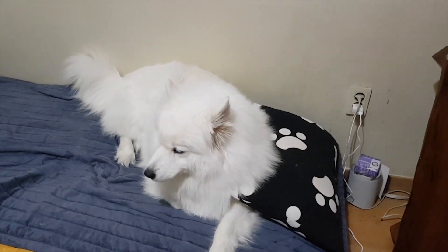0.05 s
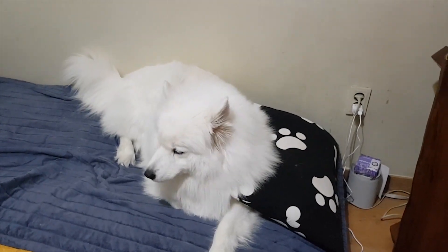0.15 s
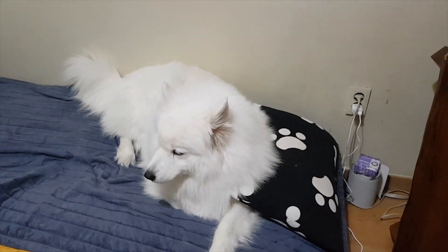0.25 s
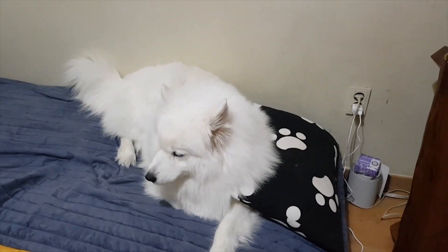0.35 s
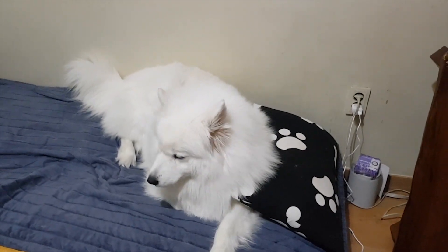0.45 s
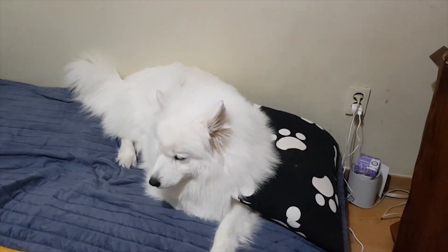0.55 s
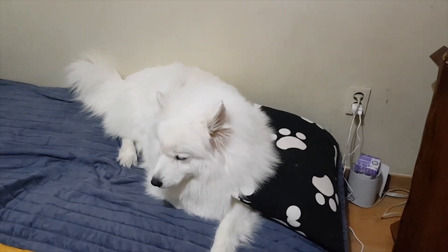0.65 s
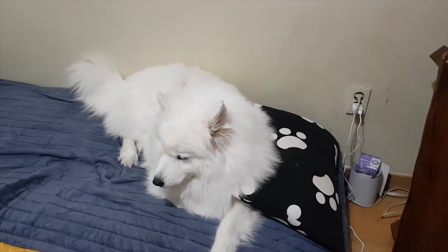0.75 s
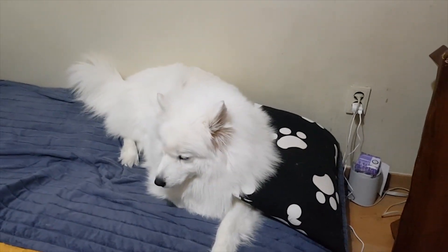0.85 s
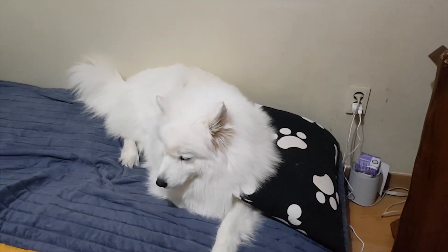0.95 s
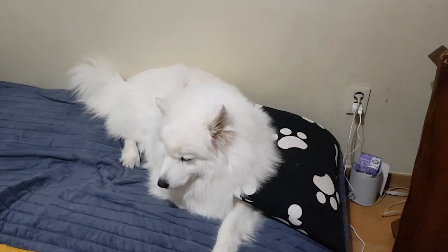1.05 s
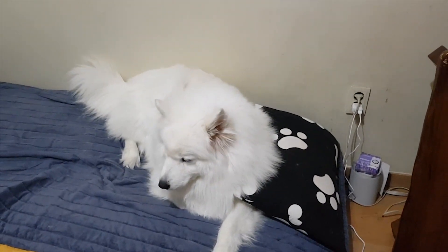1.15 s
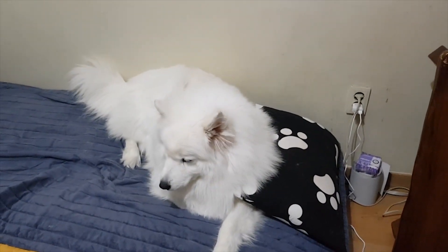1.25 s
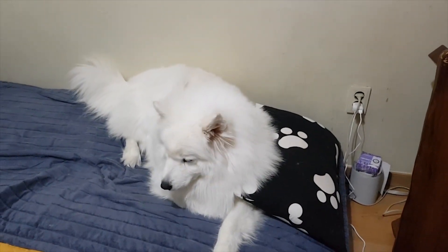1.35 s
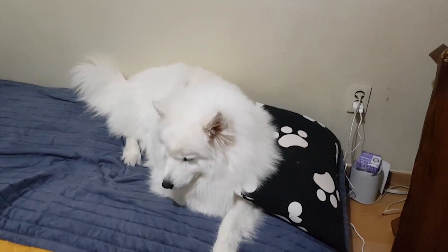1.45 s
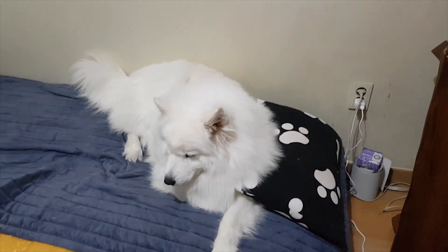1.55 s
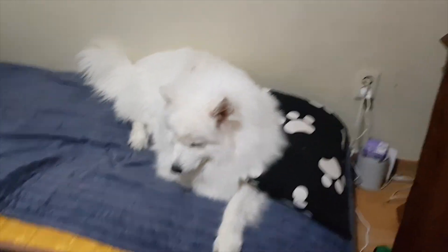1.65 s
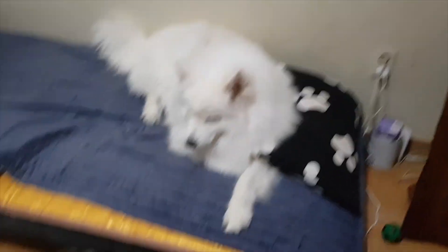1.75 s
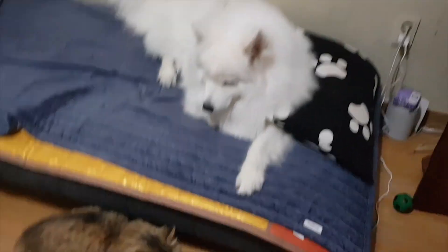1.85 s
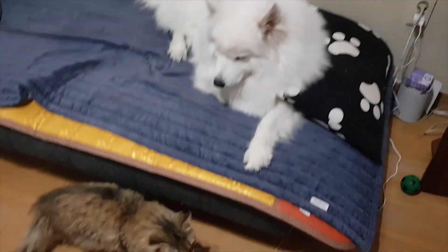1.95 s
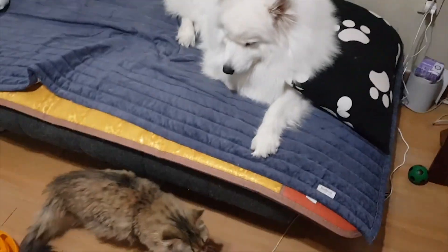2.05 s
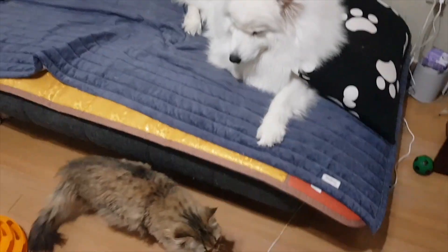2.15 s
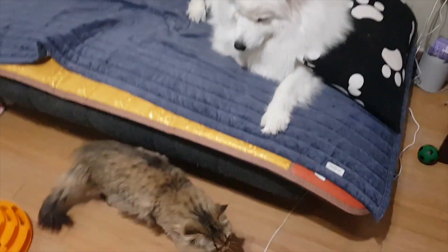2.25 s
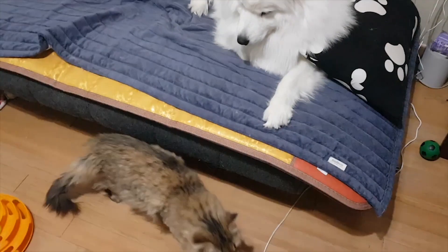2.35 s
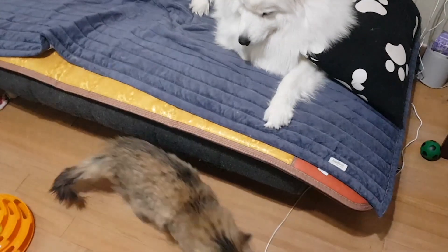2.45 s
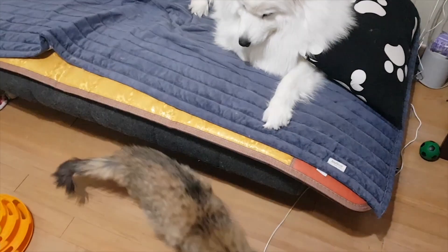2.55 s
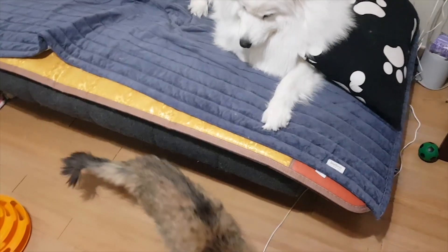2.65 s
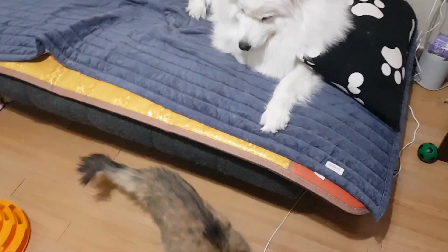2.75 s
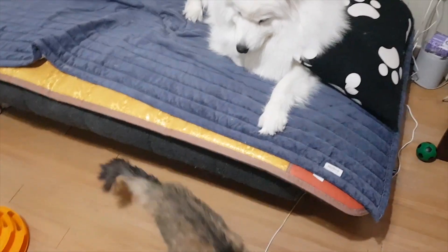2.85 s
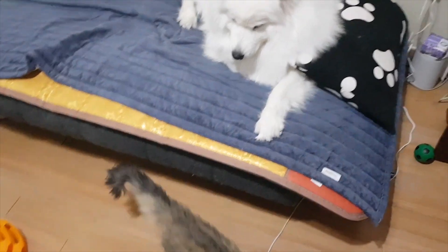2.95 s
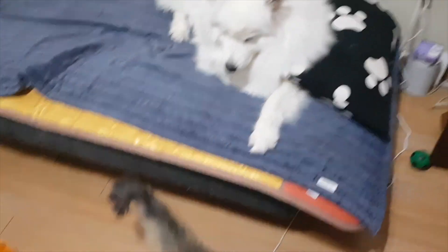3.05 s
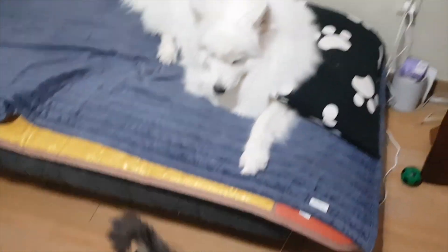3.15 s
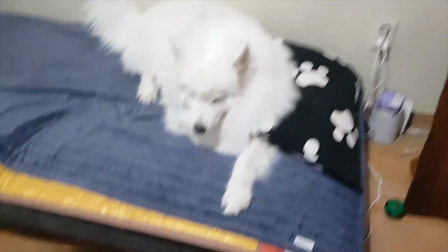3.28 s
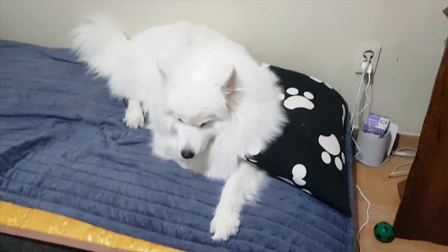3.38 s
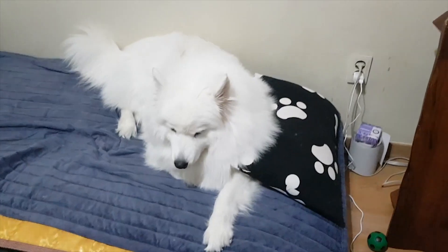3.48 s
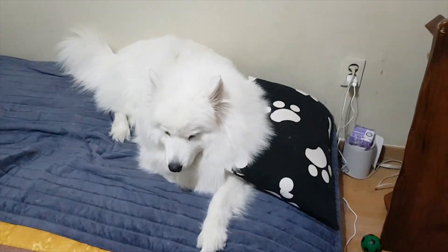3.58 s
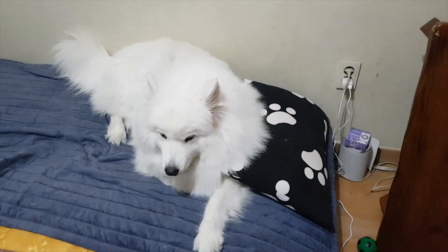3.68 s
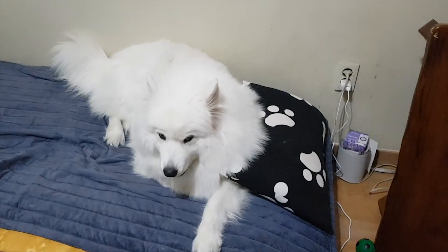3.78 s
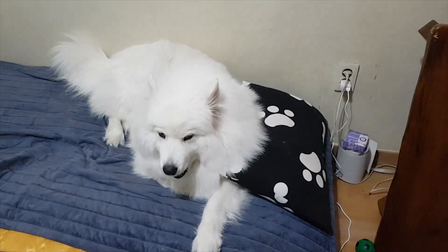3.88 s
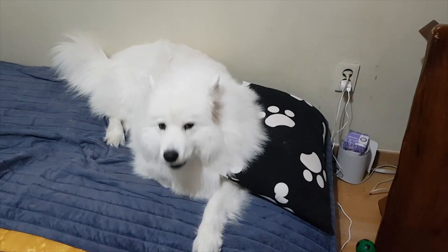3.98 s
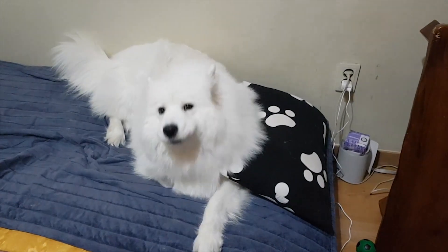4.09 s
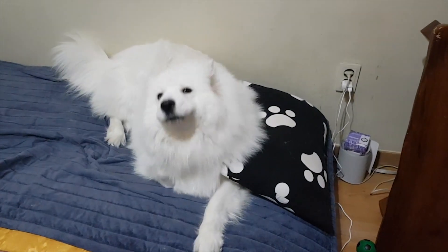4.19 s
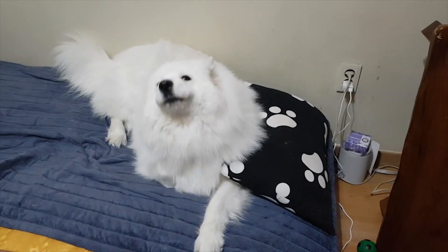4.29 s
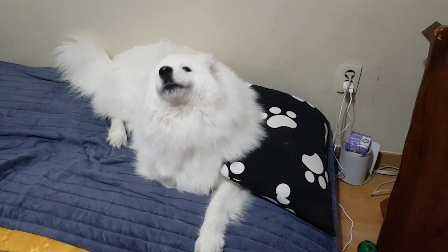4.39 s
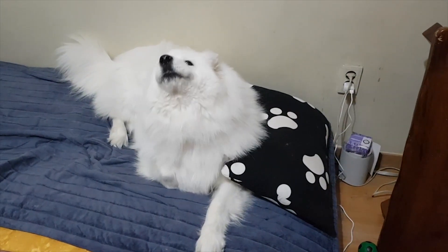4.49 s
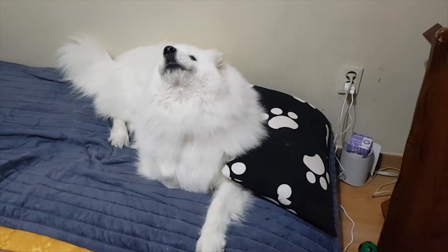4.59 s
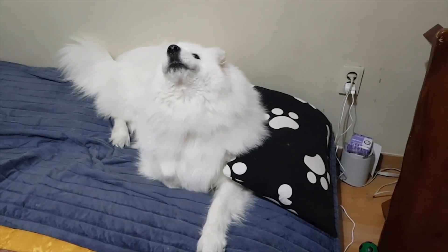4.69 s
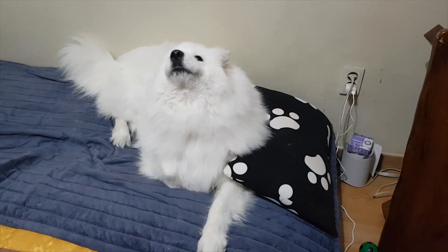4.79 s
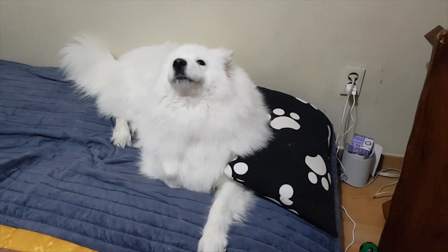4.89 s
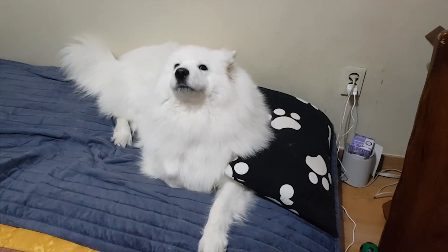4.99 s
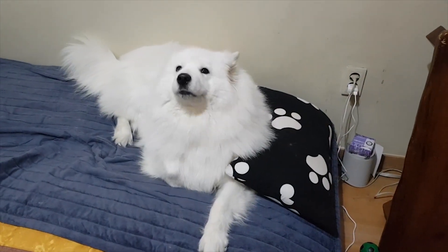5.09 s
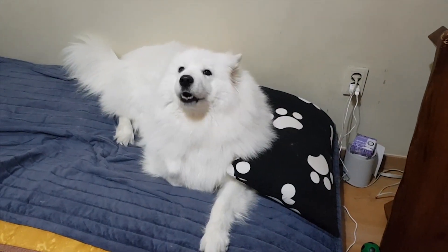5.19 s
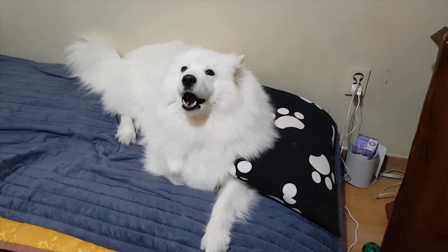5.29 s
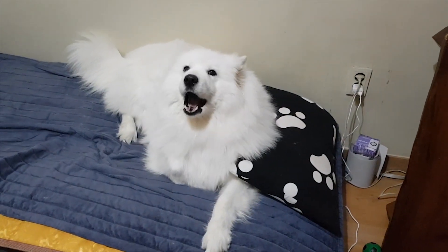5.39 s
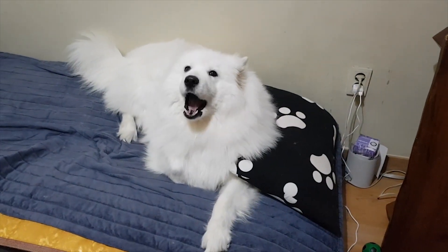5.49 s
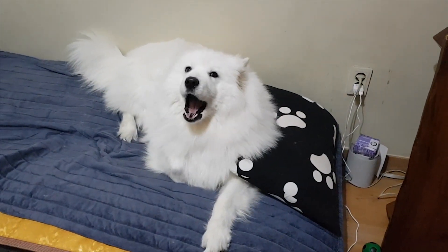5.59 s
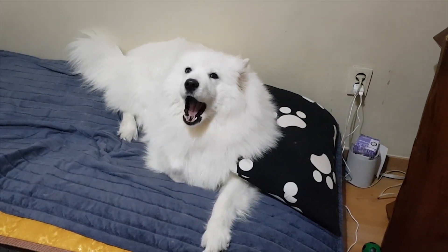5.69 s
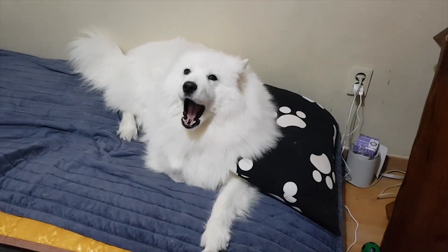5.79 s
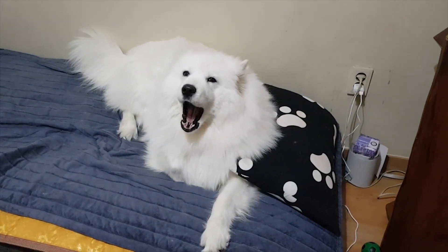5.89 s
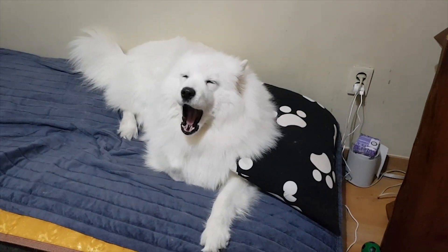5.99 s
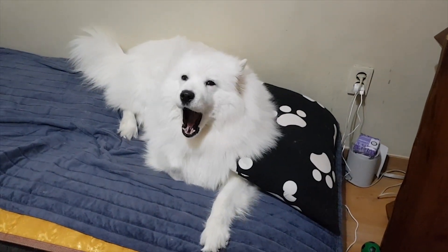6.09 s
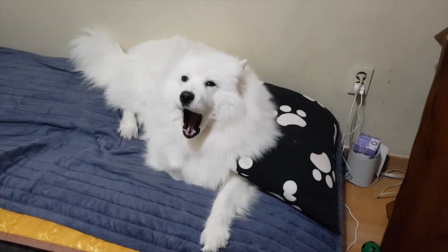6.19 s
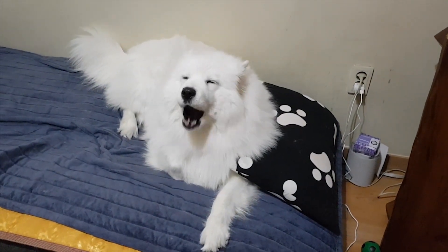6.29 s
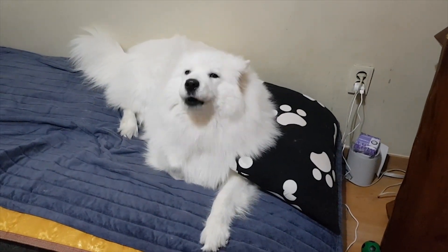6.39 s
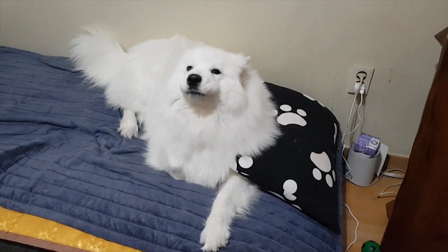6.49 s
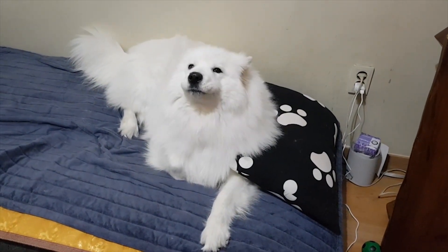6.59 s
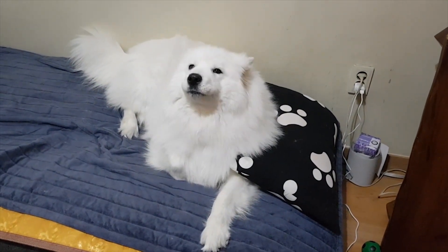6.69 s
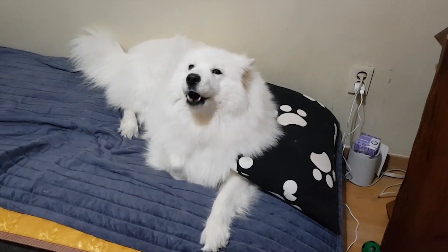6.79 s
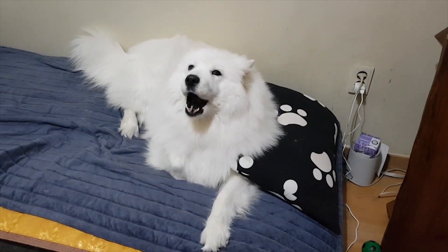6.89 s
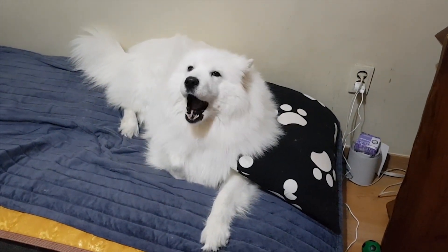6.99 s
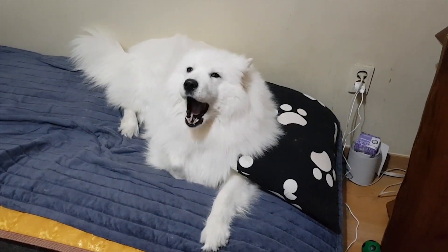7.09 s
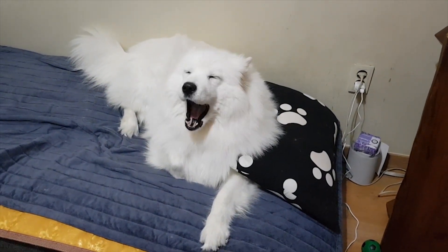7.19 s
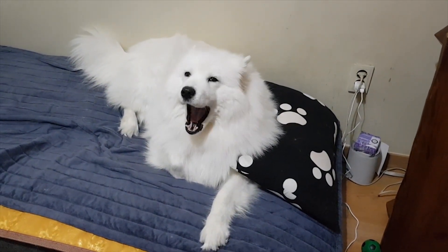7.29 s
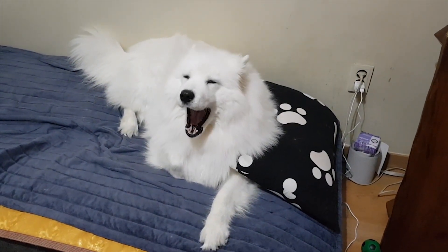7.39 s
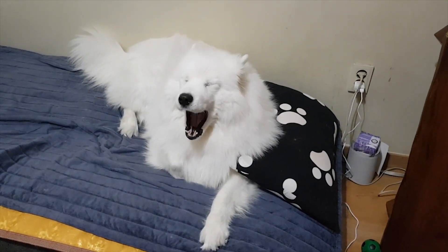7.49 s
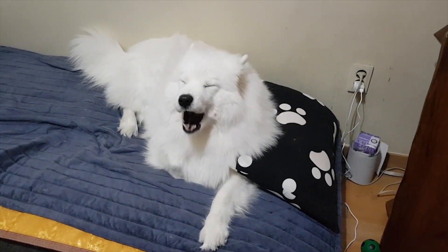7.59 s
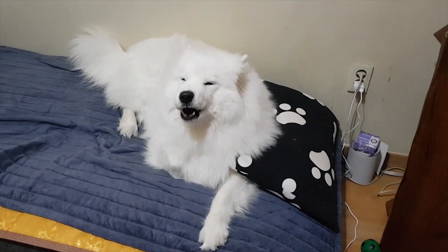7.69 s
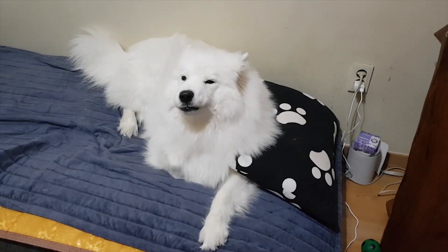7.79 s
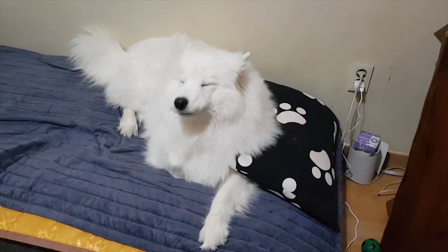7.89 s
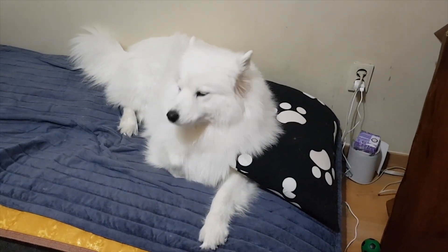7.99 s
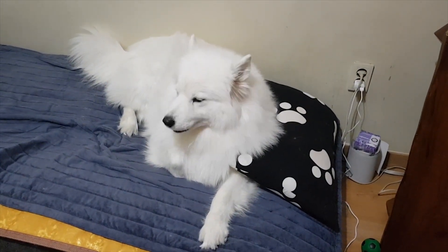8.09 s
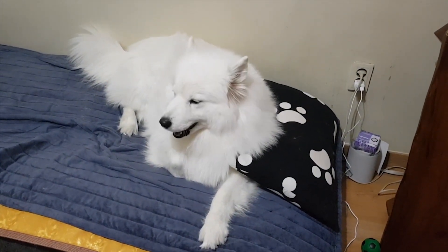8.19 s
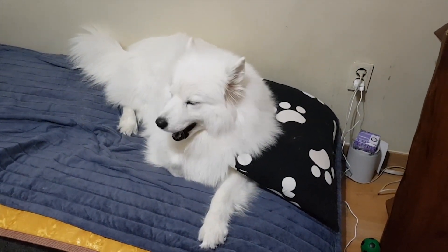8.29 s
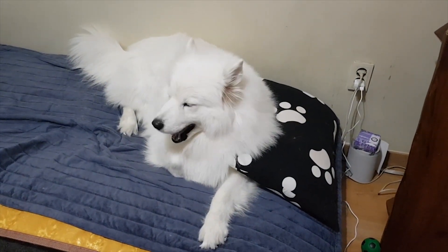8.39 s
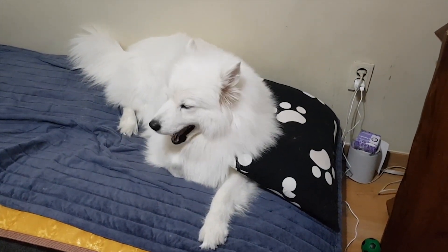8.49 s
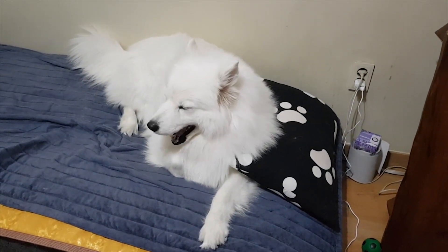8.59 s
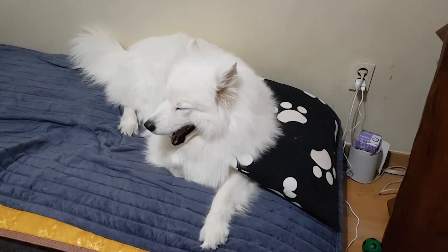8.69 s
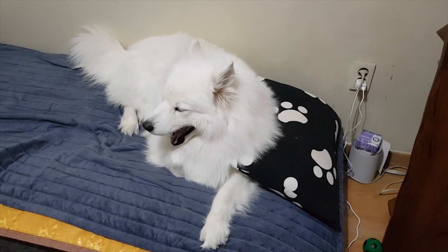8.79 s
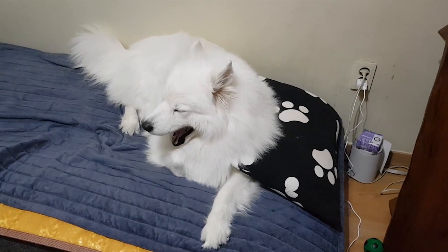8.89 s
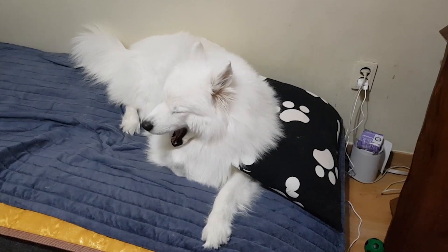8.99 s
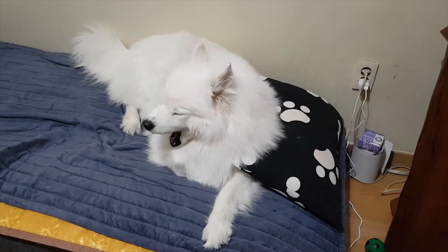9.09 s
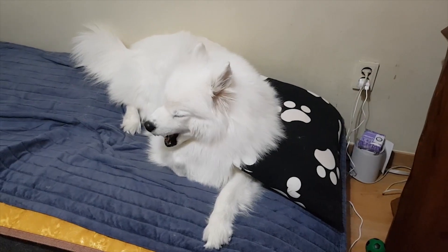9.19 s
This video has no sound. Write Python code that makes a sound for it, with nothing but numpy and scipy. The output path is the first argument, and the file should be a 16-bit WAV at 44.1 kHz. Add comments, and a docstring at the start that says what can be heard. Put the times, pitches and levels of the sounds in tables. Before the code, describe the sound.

Close, pulsing dog grumbles rise into brief howls, with a few soft cat meows and light floor taps early on.

```python
"""A dog grumbles at a cat

In a small, quiet bedroom, a dog on a mattress growls: its loose vocal folds slap shut in slow pulses,
speed up, tighten into a clean howl and fall back. Its nose whistles and its lips smack. Further off,
a cat meows and chirps, shaping the sound with its jaw, and a few taps and crackles come from the floor.
A phone with two microphones hears it all from about a metre, over a low room rumble."""
import sys
import numpy as np
from scipy import signal
from scipy.fft import rfft, irfft
from scipy.io import wavfile

SR = 44100
rng = np.random.default_rng(int(sys.argv[2]) if len(sys.argv) > 2 else 0)


def file_out(sig):
    """Save sig as 16-bit WAV at sys.argv[1]."""
    # one column per channel
    cols = np.atleast_2d(sig).T
    # limit, then scale
    lim = np.clip(cols, -1, 1)
    pcm = np.round(lim * 32767).astype(np.int16)
    wavfile.write(sys.argv[1], SR, pcm)


N = 407925

# The dog's growls. Each row: start and length in seconds, first and last pulse rate in Hz, middle and
# width of the turn between them as shares of the length, base level in dB, fade-in and fade-out in
# seconds, mouth level and its mid-growl change in dB, roughness from 0 to 1, and the factor by which
# the lips shift the muzzle's resonances.
DOG_GROWLS = [ (0.0, 0.75, 67.9, 44.37, 0.73, .14, -36.5, 0.0058, 0.18, -26.5, -9, .2, 1.153),
              (1.3, 0.33, 60.77, 53.8, 0.81, .12, -39.5, .18, 0.23, -28, -11, 0.67, 1.27),
              (3.15, 1.17, 51.68, 101.7, .63, .1, -39.5, 0.2, .04, -28.5, -22, 0.26, 1),
              (4.301, 0.34, 103.6, 84.8, 0.57, 0.095, -46, 0.019, .02, -22, 1.5, .9, .95),
              (4.579, 0.58, 80.9, 50.23, 0.53, 0.059, -34, 0.0076, 0.18, -29, -7, .62, 0.99),
              (5.671, 0.72, 72.43, 110.2, .73, 0.15, -34, .13, 0.099, -33.5, -7.5, .18, .99),
              (6.75, 0.47, 78.23, 102.2, 0.74, .2, -29.5, 0.022, 0.6, -34, -12.5, 0.17, .9),
              (8.051, 0.25, 61.3, 46.94, .55, 0.16, -37, .01, 0.22, -37, 4.5, 0.89, 1.06),
              (8.68, 0.39, 57.27, 65.5, 0.42, 0.18, -53.5, 0.038, 0.046, -43, 1, .9, 1.05), ]
# One list for each howl. Each row: time in seconds, pitch in Hz, base levels of voice and mouth in dB.
DOG_HOWLS = [
    [(4.22, 199.6, -26.5, -73.5), (4.27, 206.2, -27.5, -62), (4.45, 218.6, -29.5, -59),
     (4.56, 207.6, -28.5, -62.5), (4.61, 209, -31.5, -71)],
    [(6.32, 203.6, -34, -68.5), (6.37, 223.5, -28, -60.5), (6.405, 228.6, -20.5, -59.5),
     (6.49, 231.2, -22.3, -57), (6.61, 222.5, -24.5, -55), (6.66, 205.7, -32.5, -54),
     (6.78, 189.2, -35.5, -61.5)],
    [(7.2, 239.5, -31.5, -91.5), (7.245, 230.3, -29, -83.5), (7.35, 275.6, -30.5, -88),
     (7.55, 355.4, -33.5, -87.5), (7.7, 363.2, -36, -82.5), (7.86, 378.3, -36.5, -87),
     (7.935, 364.3, -45, -88), (8.025, 237, -28, -72), (8.11, 232.3, -59.5, -73.5)],
    [(8.97, 217, -52, -83), (9.01, 246, -41, -94), (9.08, 287.6, -49, -100), (9.2, 321, -56.5, -103)],
]
# Thin whistles through the dog's nose, and whining tones over its growl.
# Each row: start and length in seconds, first and last pitch in Hz, base level in dB.
NOSE_WHISTLES = [(3.4, .72, 5480, 5390, -85.5), (6.49, .2, 5850, 5820, -74.5)]
DOG_WHINES = [(6.289, 0.15, 925, 841, -49.5), (6.768, .27, 762, 906, -55)]
# The dog's lips and tongue. Each row: start in seconds, peak in dB, resonance and its width in Hz.
LIP_SMACKS = [(4.057, -58.5, 3440, 448), (5.296, -56, 890, 59.6), (5.298, -73, 2020, 200),
              (5.419, -61, 1040, 120), (5.462, -72, 2710, 300), (6.382, -49, 2230, 594)]
# The cat's calls. Each row: start and length in seconds, first, turning and last pitch in Hz, share of
# the length before the turn, base level in dB, fade-in and fade-out in seconds, first and last jaw
# resonance in Hz, its shift as the jaw gapes in Hz, and how long the call stays hoarse in seconds.
CAT_MEOWS = [ (0.66, 0.5, 540.4, 604.6, 545.4, 0.82, -52, 0.075, 0.015, 1370, 2490, 2200, .25),
             (1.678, 0.32, 646, 673.3, 656, 0.61, -51.5, .27, .14, 1970, 2000, 0, 0.174),
             (2.041, 0.076, 705, 728, 726, 0.88, -68, 0.036, 0.06, 2150, 2150, 0, 0.036),
             (2.98, 0.36, 446.5, 543, 555, .77, -46.5, 0.18, 0.27, 1640, 2720, -250, 0.177), ]
# Taps and crackles. Each row: start in seconds, level in dB, snap compared with the knock in dB.
FLOOR_TAPS = [(.429, -48.5, -5), (0.45, -54, -25), (0.532, -60.5, -3), (1.581, -59.5, 14.5),
              (1.599, -60, 12), (1.619, -58.5, 17.5), (1.628, -58.5, 9), (1.655, -66, -6), (1.662, -56, 8),
              (2.126, -63.5, -8)]
# Standing waves: notes that ring on in the dog's corner. Each row: frequency and width in Hz, gain in dB.
STANDING_WAVES = [(105.9, 1.9, 4), (156, 11, -8), (219, 7.4, -15), (468, 4.7, 7.5), (607, 28, -0.5),
                  (729, 8.3, 9), (1066, 12, 10.5)]

# A tone colour says how strong the lows and highs are. Each row: frequency in Hz, relative level in dB.
THROAT_COLOUR = [(50, -33.5), (80, -12.5), (102, 3), (120, -5), (148, 0.5), (190, -0.5), (245, 7.5),
                 (310, -5.5), (380, -15), (460, -20), (540, -20), (620, -28.5), (760, -40), (980, -53),
                 (1500, -74)]  # the dog's chest and throat, together with the room's low standing waves near 100, 120 and 150 Hz
HALF_CLOSED_MUZZLE = [(450, -22.5), (640, 16.5), (720, 4.5), (820, -7), (950, -7), (1150, -2.5), (1420, 1),
                      (1560, -16.5), (1750, -24), (2200, -20), (2700, -39), (8000, -37.5), (15000, -50)]
OPEN_MUZZLE = [(500, -28), (850, 4.5), (1000, -14.5), (1150, 4), (1350, 5), (1520, -10), (1700, -23),
               (2100, -5), (2500, -17), (2850, -33), (3350, -37.5), (4300, -43), (9000, -30.5),
               (15000, -48)]
CAT_MOUTH_COLOURS = [
    [(550, -8), (830, 1), (1130, 9.5), (1700, 2), (3700, -5), (5400, -6), (6400, -18.5), (7500, -30)],
    [(660, -3), (1300, -21), (2000, 1), (2600, -22), (8000, -47)],
    [(700, -18), (2100, 2), (2800, -25), (8000, -50)],
    [(480, -3), (950, 11), (1300, -10), (1950, 9.5), (2700, -9.5), (3100, -24), (3750, -7.5), (4600, -6.5),
     (5400, -16), (9000, -27)],
]  # one list for each meow
KNOCK_COLOUR = [(150, -11), (450, 16.5), (900, 1), (1900, 2.5), (3000, -9.5), (6000, -14.5), (15000, -23)]
SNAP_COLOUR = [(1000, -62), (3500, -9.5), (7000, -10), (11000, -1.5), (15500, -7)]
REVERB_COLOUR = [(240, -21), (380, -15), (550, -6), (1500, 1), (4000, 4), (15000, 1)]  # bright, as the muzzle beams its treble away from the phone
RUMBLE_COLOUR = [(20, -29.5), (58, -4.5), (78, -11), (112, -4), (140, -9.5), (190, -17), (260, -21.5),
                 (660, -37), (2000, -48), (8000, -53), (12500, -49)]


def growl(row, tremor=.014, sway_db=1.33, jitter=.13, scatter_db=4, gurgle_db=-11, breath_db=3):
    """Loose vocal folds slap shut at a slow rate; each slap rings the chest, throat and muzzle."""
    (start_s, length_s, first_hz, last_hz, turn, turn_width, base_db,
     attack_s, release_s, open_db, middle_db, held_rough, lips) = row
    t, edges, progress = call_timeline(start_s, length_s)
    # Effort moves once, in an S-curve. The level follows the pulse rate by 7.5 dB an octave.
    hz = first_hz + (last_hz - first_hz) / (1 + np.exp((turn - progress) / turn_width))
    db = base_db + 7.5 * np.log2(hz / first_hz) + swell(t, attack_s, release_s) + sway_db * wobble(t, 14)
    mouth_db = open_db + 4 + middle_db * np.sin(np.pi * progress)
    cycles = phase_of(hz * (1 + tremor * wobble(t, 25))) / (2 * np.pi)
    beats = np.searchsorted(cycles, np.arange(.1, cycles[-1]))
    # The folds beat unevenly until they settle, and again as they give way.
    settle_s, give_way_s = .05, .09
    unsettled = np.exp(-np.minimum((t - t[0]) / settle_s, (t[-1] - t) / give_way_s) ** 2)
    rough = np.clip(held_rough, .75 * unsettled, 1)
    timing, strength = rng.standard_normal((len(beats), 2)).T
    shift = (jitter * rough[beats] ** 1.5 * timing * SR / hz[beats]).astype(int)
    pulses = np.zeros(len(t))
    pulses[np.clip(beats + shift, 0, len(t) - 1)] = gain(scatter_db * rough[beats] * strength)
    # Air hisses through the folds just after each slap.
    airflow = signal.lfilter([1], [1, -np.exp(-1 / (.0036 * SR))], pulses)
    puffs = normalize(airflow * rng.standard_normal(len(t)))
    pulses = normalize(pulses)
    throat = ring(pulses + rough * gain(gurgle_db) * puffs, THROAT_COLOUR)
    # One throat resonance comes out as the dog presses harder.
    pressed = resonate(throat, hz=385, width_hz=49) * gain(2 + 25 * np.log2(hz / 108.5))
    throat = even_out(room_corner(throat + pressed))
    muzzle_colour = np.array(HALF_CLOSED_MUZZLE) * [lips, 1]
    muzzle = even_out(ring(pulses + gain(breath_db) * puffs, muzzle_colour))
    return t[0], (throat + gain(mouth_db) * muzzle) * gain(db) * edges


def howl(points, waver=.005, jitter=.008, shimmer_db=1.72, breath_db=-5, echo_s=.0305, echo_db=-19.5):
    """Tight folds swing in an almost pure tone; the open mouth lets out higher harmonics and air."""
    t, edges, hz, db, mouth_db = trace_curves(points)
    phase = phase_of(hz * (1 + waver * wobble(t, 45) + jitter * wobble(t, 260)))
    # Harmonics 2 and 3 grow as the mouth opens, and flare as they glide through standing waves.
    second = gain((db + mouth_db) / 2 - 2.5) * np.sin(2 * phase)
    third = gain(mouth_db + 4) * np.sin(3 * phase)
    low = gain(db) * np.sin(phase) + room_corner(second + third)
    upper = sum(gain_at(k * hz, OPEN_MUZZLE) * np.sin(k * phase) for k in range(4, 19))
    air = ring(rng.standard_normal(len(t)) * (1 + np.cos(phase)), OPEN_MUZZLE)
    bright = gain(mouth_db - 3) * (even_out(upper) + gain(breath_db) * normalize(air))
    # A little swirling air rings the throat as well.
    husk = gain(mouth_db + 11) * coloured_noise(len(t), THROAT_COLOUR)
    voice = (low + bright + husk) * gain(shimmer_db * wobble(t, 60)) * edges
    # A late wall echo beats against the gliding pitch.
    echo = gain(echo_db) * np.interp(t - echo_s, t, voice) * edges
    return t[0], voice + echo


def whistle(row, flutter=.035, trim_db=-3):
    """The dog's whistle or whine: a thin tone that swells, glides and flutters in pitch and strength."""
    start_s, length_s, first_hz, last_hz, base_db = row
    t, edges, progress = call_timeline(start_s, length_s)
    hz = first_hz + (last_hz - first_hz) * progress
    tone = np.sin(phase_of(hz * (1 + flutter * wobble(t, 300))))
    tone *= 1 + wobble(t, hz.mean() / 10)
    db = base_db + trim_db + swell(t, attack_s=.36 * length_s, release_s=.86 * length_s)
    return t[0], normalize(tone) * gain(db) * edges


def lip_smack(db, hz, width_hz, decay_s=.0029, size=4000):
    """Wet lips part and ring the hollow of the mouth."""
    burst = rng.standard_normal(size) * np.exp(-np.arange(size) / SR / decay_s)
    pop = resonate(burst, hz, width_hz)
    return gain(db) * pop / np.abs(pop).max()


def meow(row, mouth_colour, jitter=.0458, half_db=-6, air_db=-13, jaw_db=8, jaw_width_hz=260, trim_db=-7):
    """The cat cries through a resonance that moves with its jaw; while hoarse, the pitch shakes."""
    (start_s, length_s, first_hz, turn_hz, last_hz, turn, base_db,
     attack_s, release_s, first_jaw_hz, last_jaw_hz, gape_hz, hoarse_s) = row
    t, edges, progress = call_timeline(start_s, length_s)
    # The pitch climbs ever faster up to the turn, then heads for its last value.
    hz = np.interp(progress ** 3, [0, turn ** 3, 1], [first_hz, turn_hz, last_hz])
    db = base_db + trim_db + swell(t, attack_s, release_s)
    jaw_hz = first_jaw_hz + (last_jaw_hz - first_jaw_hz) * progress
    jaw_hz += gape_hz * np.sin(np.pi * progress) ** 2
    # The voice starts hoarse, clears, and turns hoarse again as it ends.
    clearing_s, hoarse_end_s = .06, .02
    clear_for_s = np.minimum(t - t[0] - hoarse_s + clearing_s / 2, t[-1] - t - hoarse_end_s)
    rough = np.interp(clear_for_s, [0, clearing_s], [.8, .17])
    phase = phase_of(hz * (1 + jitter * rough * wobble(t, 307.1)))
    voice = 0
    for k in np.arange(1, 14, .5):
        jaw_boost = 1 + gain(jaw_db) / (1 + ((k * hz - jaw_hz) / jaw_width_hz) ** 2)
        share = rough * gain(half_db) if k % 1 else 1  # hoarseness adds tones between the harmonics
        voice += share * jaw_boost * gain_at(k * hz, mouth_colour) * np.sin(k * phase)
    air = rough * gain(air_db) * coloured_noise(len(t), mouth_colour)
    return t[0], (even_out(voice) + air) * gain(db) * edges


def floor_tap(db, snap_db, knock_s=.025, snap_s=.0017, size=4000):
    """A light knock with a dry snap on top: two bursts of noise that die away fast."""
    t = np.arange(size) / SR
    knock = coloured_noise(size, KNOCK_COLOUR) * np.exp(-t / knock_s)
    snap = coloured_noise(size, SNAP_COLOUR) * np.exp(-t / snap_s)
    return gain(db) * (knock + gain(snap_db) * snap)


def room_corner(x, echo=.31):
    """Near walls smear each pulse by a few milliseconds, and standing waves keep it ringing."""
    for gap_samples in (97, 173):
        comb = np.r_[1, np.zeros(gap_samples), -echo]
        x = signal.lfilter(comb[::-1], comb, x)  # smears the timing but keeps the tone colour
    return x + sum(gain(db) * resonate(x, hz, width_hz) for hz, width_hz, db in STANDING_WAVES)


def bedroom(x, reverb_db, pan_db, lead_s, reverb_s=.26, size=22000):
    """Sound reaches the left microphone first; the walls answer each microphone differently."""
    t = np.arange(size) / SR
    decay = gain(-60 * t / reverb_s) * np.clip((t - .003) / .005, 0, 1)
    tails = rng.standard_normal((2, size)) * decay / np.sqrt(np.sum(decay ** 2))
    spill = ring(x, REVERB_COLOUR) * gain(reverb_db)
    delayed = np.interp(np.arange(N) - lead_s * SR, np.arange(N), x)
    walls = np.array([signal.fftconvolve(spill, tail)[:N] for tail in tails])
    return pan(np.array([x, delayed]) + walls, pan_db)


def room_rumble(db=-56.5, pan_db=2, apart_hz=900):
    """The building's low rumble, alike at both microphones, with their own faint hiss on top."""
    hz = np.arange(N // 2 + 1) * SR / N
    mid, side = rfft(rng.standard_normal((2, N))) * gain_at(hz, RUMBLE_COLOUR)
    centre = irfft(mid, N)
    width = irfft(side * (1 - .83 / (1 + (hz / apart_hz) ** 2)), N)
    pair = np.array([centre + width, centre - width]) / np.std(centre)
    return pan(pair * gain(db), pan_db)


def gain(db):
    """Turn decibels into a number to multiply by."""
    return 10 ** (np.asarray(db) / 20)


def gain_at(hz, colour):
    """How strongly a tone colour passes the given frequencies."""
    known_hz, db = np.transpose(colour)
    return gain(np.interp(np.log(np.maximum(hz, 1)), np.log(known_hz), db))


def ring(x, colour, size=4096):
    """Give a sound a tone colour, so that each pulse rings after it strikes and never before."""
    cepstrum = irfft(np.log(gain_at(np.arange(size // 2 + 1) * SR / size, colour)))
    cepstrum[1:size // 2] *= 2
    cepstrum[size // 2 + 1:] = 0
    pulse_response = irfft(np.exp(rfft(cepstrum)))
    return signal.fftconvolve(x, pulse_response)[:len(x)]


def resonate(x, hz, width_hz):
    """A resonance: keep one narrow band of frequencies."""
    return signal.lfilter(*signal.iirpeak(hz, hz / width_hz, fs=SR), x)


def coloured_noise(size, colour):
    """Noise with a tone colour, at level 1."""
    return normalize(ring(rng.standard_normal(size), colour))


def normalize(x):
    """Scale to an average (rms) level of 1."""
    return x / np.sqrt(np.mean(x ** 2))


def even_out(x, size=2600):
    """Even out slow changes of level, keeping the pulses."""
    window = np.hanning(size)
    weight = signal.fftconvolve(np.ones(len(x)), window, "same")
    power = signal.fftconvolve(x ** 2, window, "same") / weight
    return x / np.sqrt(np.abs(power) + np.mean(x ** 2) / 1000)


def wobble(t, rate_hz):
    """Random motion of typical size 1 that changes course rate_hz times a second."""
    knots = np.arange(t[0], t[-1] + 2 / rate_hz, 1 / rate_hz)
    return normalize(np.interp(t, knots, rng.standard_normal(len(knots))))


def phase_of(hz):
    """The running angle of a wave that follows a pitch curve."""
    return 2 * np.pi * np.cumsum(hz) / SR


def swell(t, attack_s, release_s, quiet_db=-17.5):
    """A level in dB that rises from quiet, holds at 0 and falls back."""
    fade_in = np.maximum(1 - (t - t[0]) / attack_s, 0) ** 2
    fade_out = np.maximum(1 - (t[-1] - t) / release_s, 0) ** 2
    return quiet_db * (fade_in + fade_out)


def trace_curves(points, edge_s=.017):
    """Join up timed rows: gives sample times, soft edges and a curve for each further column."""
    times, *columns = np.transpose(points)
    t = np.arange(int(times[0] * SR), int(times[-1] * SR)) / SR
    from_edge_s = np.minimum(t - t[0], t[-1] - t)
    edges = np.sin(np.pi / 2 * np.clip(from_edge_s / edge_s, 0, 1)) ** 2
    return t, edges, *(np.interp(t, times, column) for column in columns)


def call_timeline(start_s, length_s):
    """Sample times, soft edges and progress from 0 to 1 for one call."""
    return trace_curves([(start_s, 0), (start_s + length_s, 1)])


def pan(pair, db):
    """Make the left side louder than the right by db."""
    return pair * gain([[db / 2], [-db / 2]])


def add(track, start_s, x):
    """Mix a sound into a track."""
    i = int(start_s * SR)
    track[i:i + len(x)] += x[:N - i]


def scene():
    """The dog close by, the cat and the taps further off, all in one room."""
    dog, cat, floor = np.zeros((3, N))
    for row in DOG_GROWLS:
        add(dog, *growl(row))
    for points in DOG_HOWLS:
        add(dog, *howl(points))
    for row in [*NOSE_WHISTLES, *DOG_WHINES]:
        add(dog, *whistle(row))
    for start_s, db, hz, width_hz in LIP_SMACKS:
        add(dog, start_s, lip_smack(db, hz, width_hz))
    for row, mouth_colour in zip(CAT_MEOWS, CAT_MOUTH_COLOURS):
        add(cat, *meow(row, mouth_colour))
    for start_s, db, snap_db in FLOOR_TAPS:
        add(floor, start_s, floor_tap(db, snap_db))
    return (bedroom(dog, reverb_db=7, pan_db=2.5, lead_s=.0001)
            + bedroom(cat, reverb_db=5, pan_db=2.5, lead_s=.00005)
            + bedroom(floor, reverb_db=-.5, pan_db=3, lead_s=.00003)
            + room_rumble())


def record(dry):
    """The phone cuts off the highest treble."""
    cutoff_hz = 15750
    return signal.sosfilt(signal.ellip(10, .2, 80, cutoff_hz, fs=SR, output="sos"), dry)


dry = scene()
out = record(dry)
file_out(out)
```